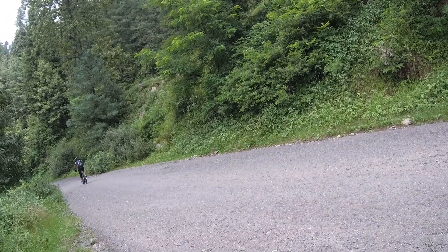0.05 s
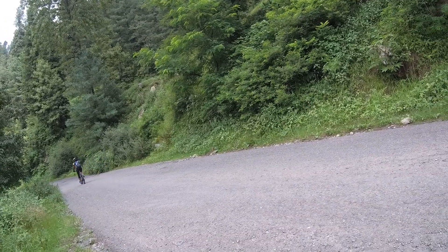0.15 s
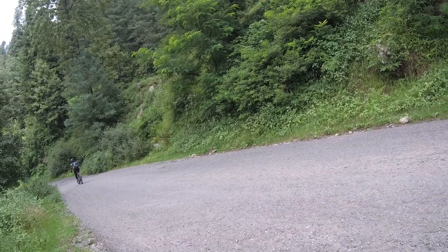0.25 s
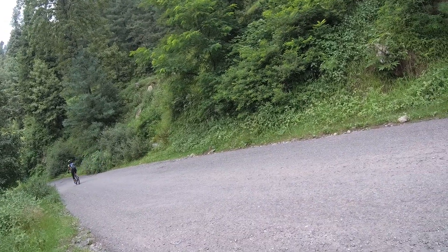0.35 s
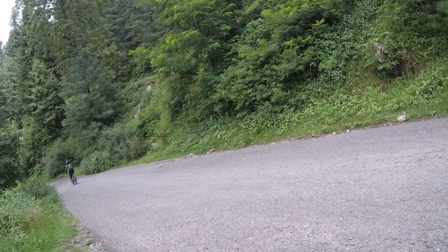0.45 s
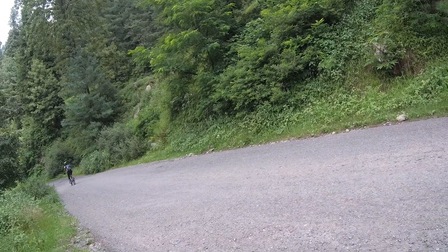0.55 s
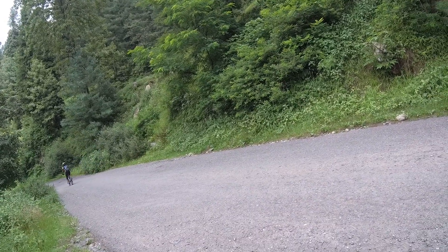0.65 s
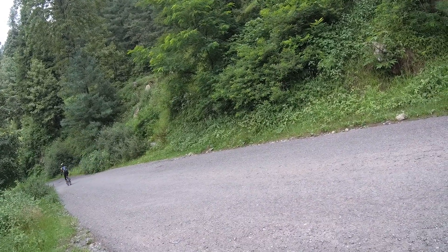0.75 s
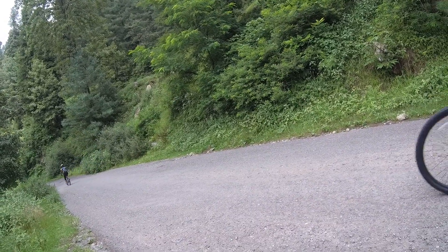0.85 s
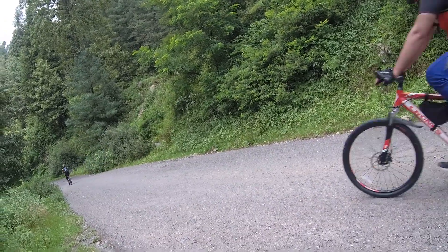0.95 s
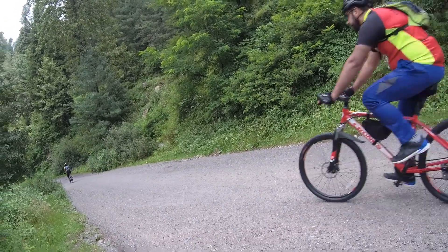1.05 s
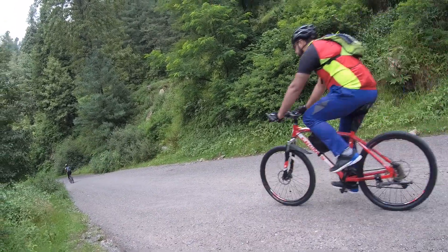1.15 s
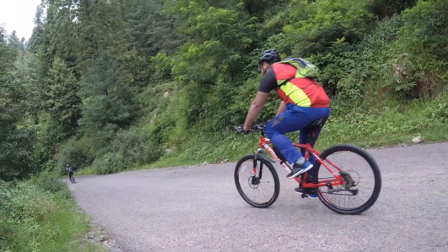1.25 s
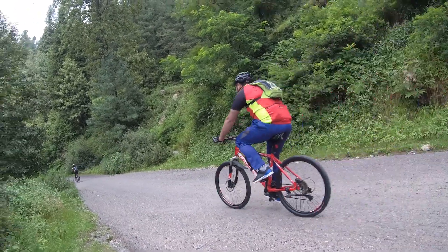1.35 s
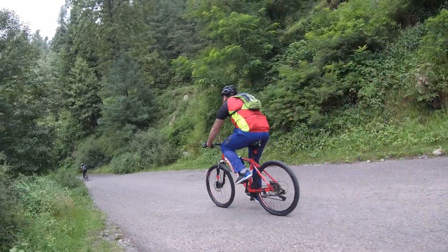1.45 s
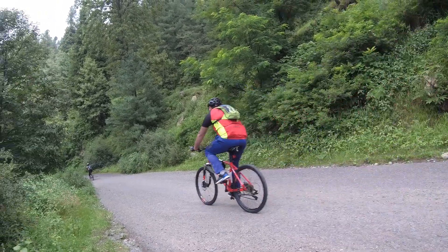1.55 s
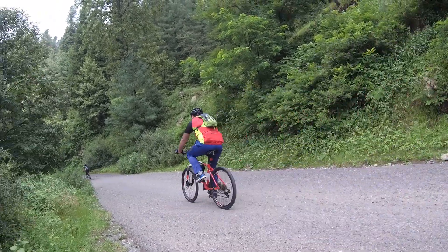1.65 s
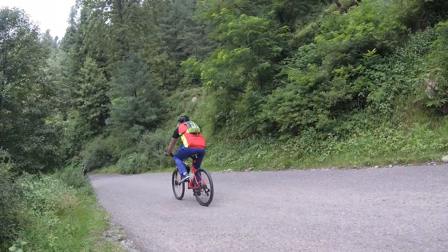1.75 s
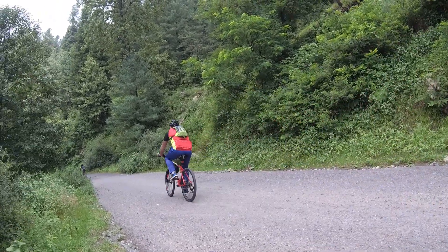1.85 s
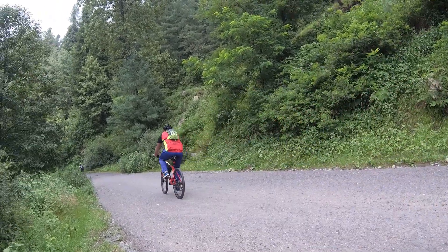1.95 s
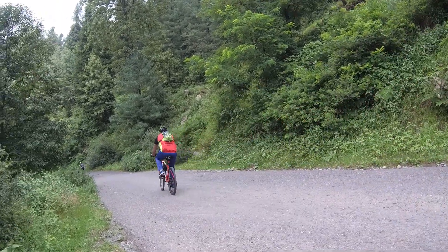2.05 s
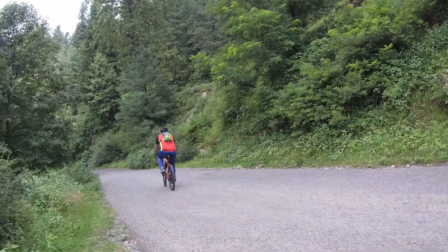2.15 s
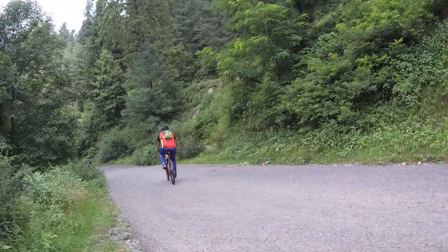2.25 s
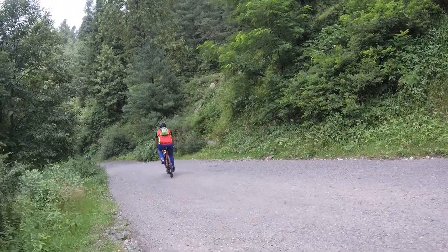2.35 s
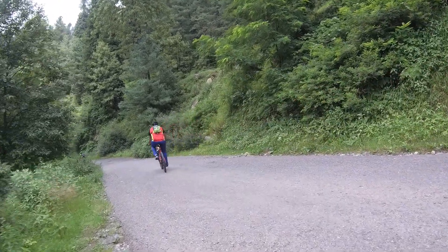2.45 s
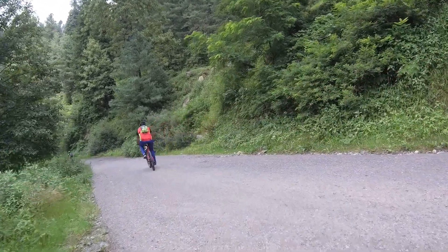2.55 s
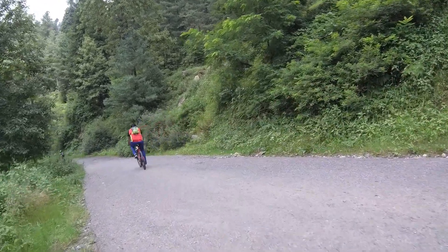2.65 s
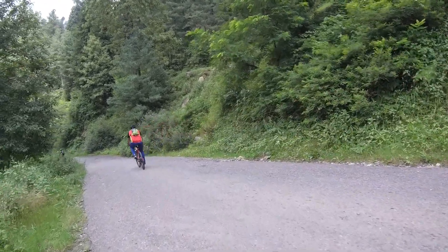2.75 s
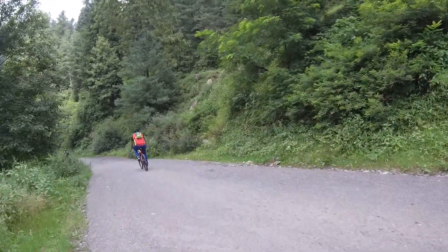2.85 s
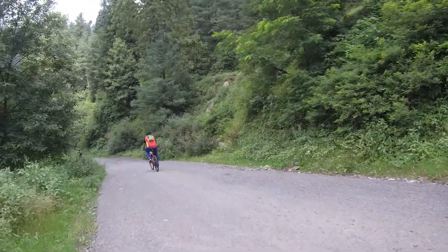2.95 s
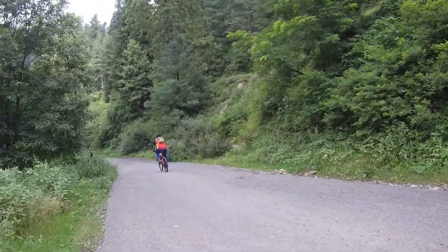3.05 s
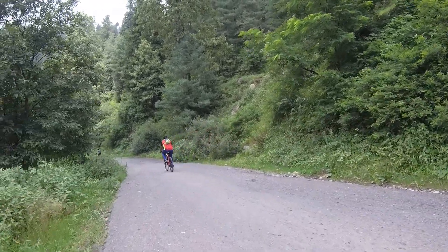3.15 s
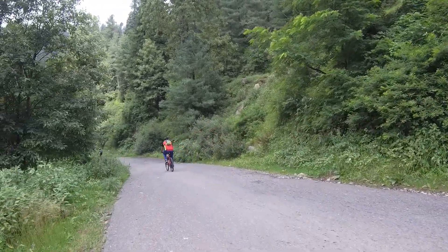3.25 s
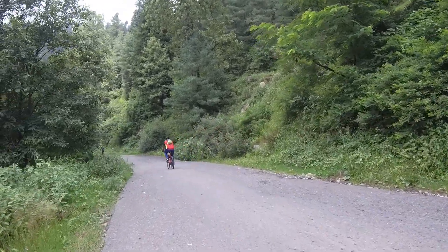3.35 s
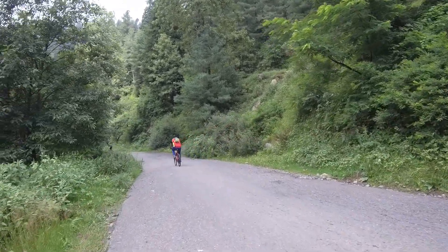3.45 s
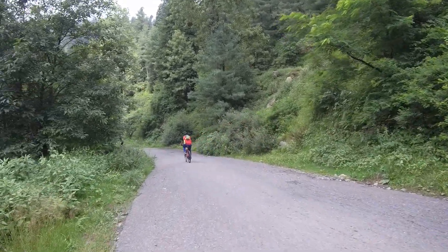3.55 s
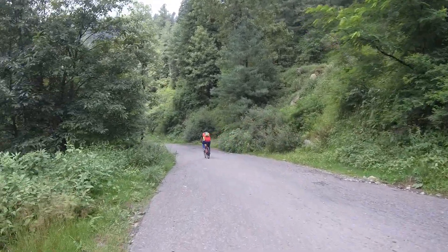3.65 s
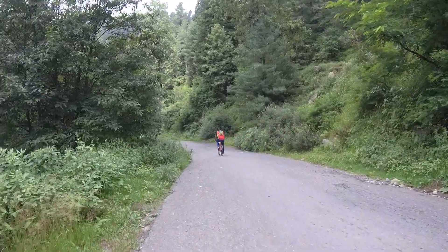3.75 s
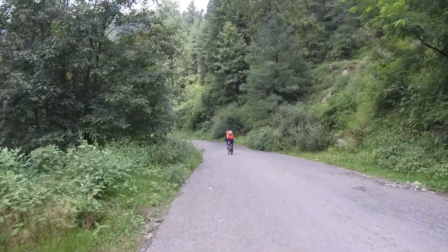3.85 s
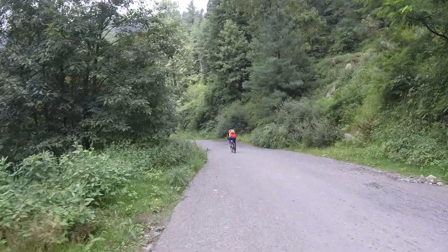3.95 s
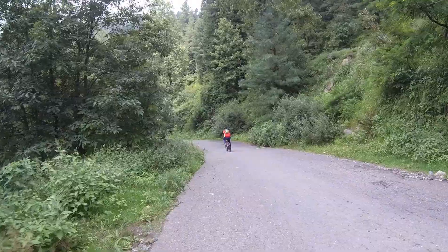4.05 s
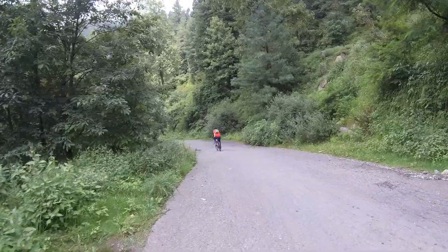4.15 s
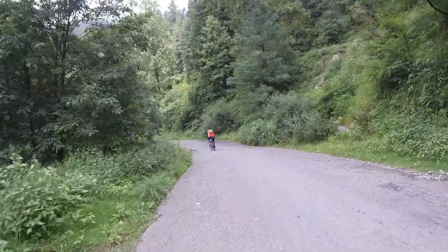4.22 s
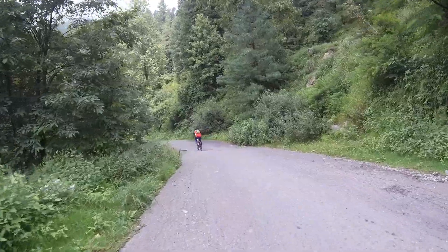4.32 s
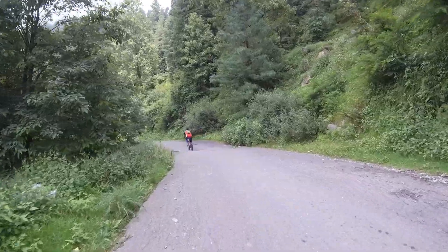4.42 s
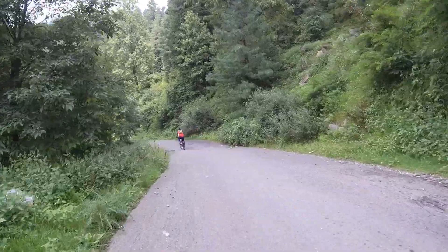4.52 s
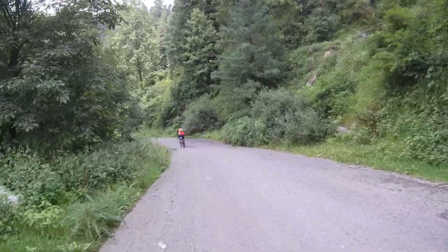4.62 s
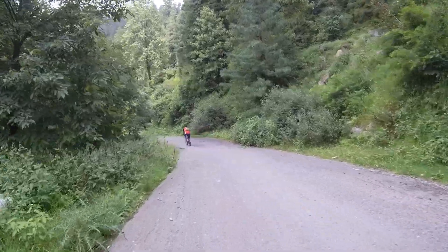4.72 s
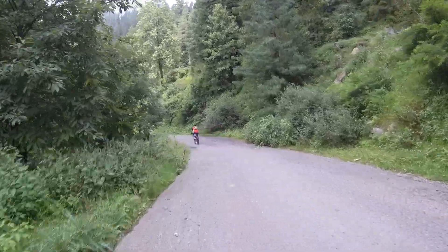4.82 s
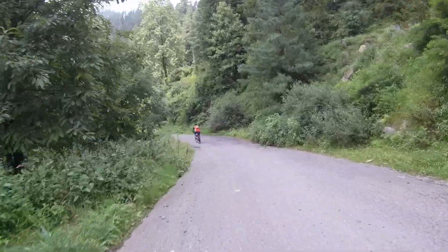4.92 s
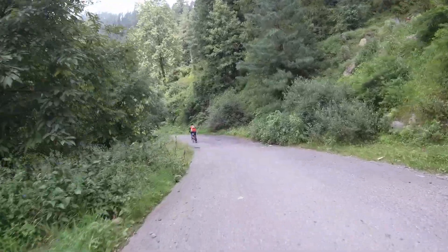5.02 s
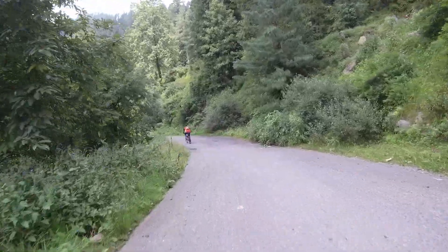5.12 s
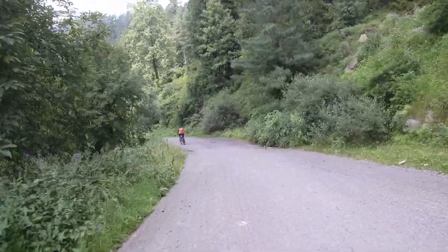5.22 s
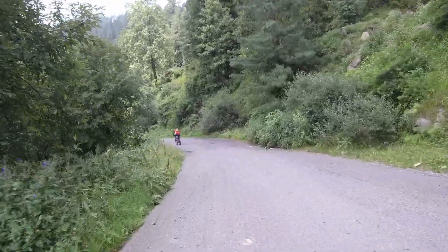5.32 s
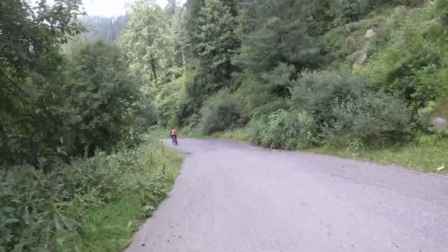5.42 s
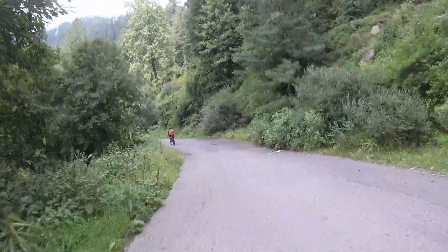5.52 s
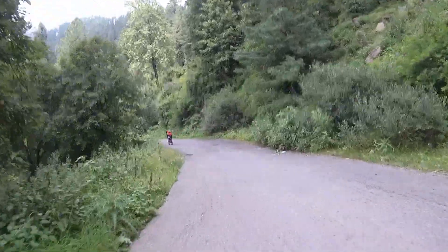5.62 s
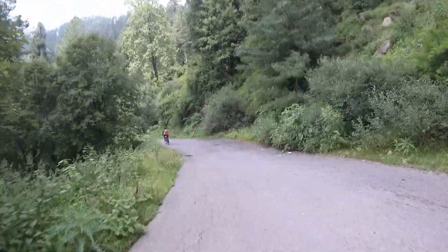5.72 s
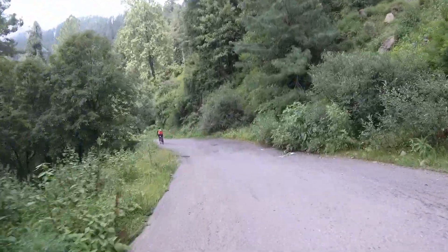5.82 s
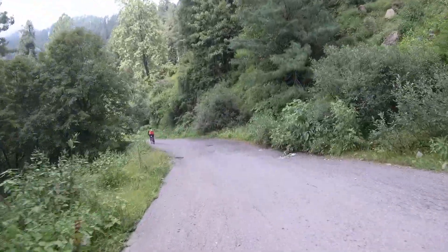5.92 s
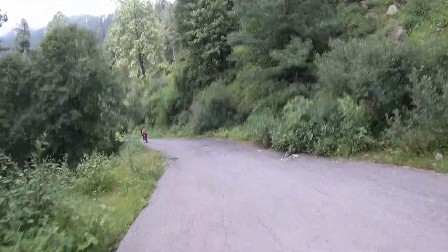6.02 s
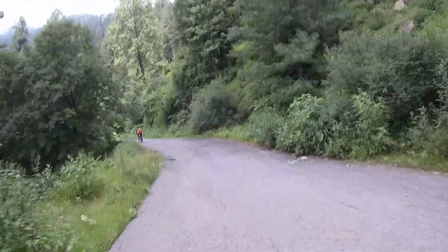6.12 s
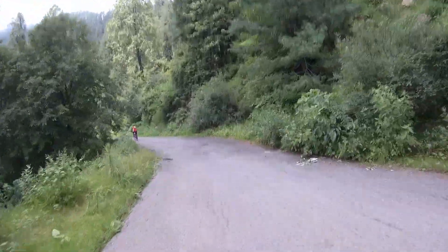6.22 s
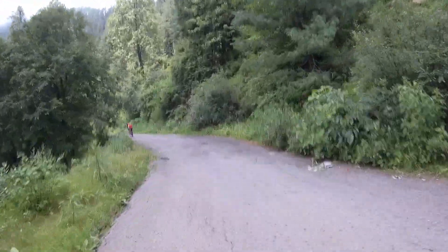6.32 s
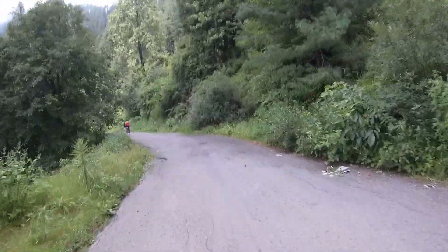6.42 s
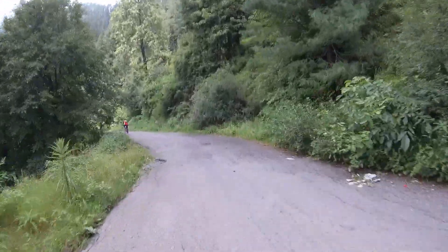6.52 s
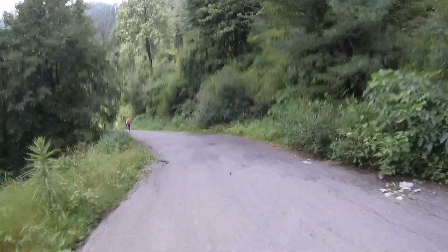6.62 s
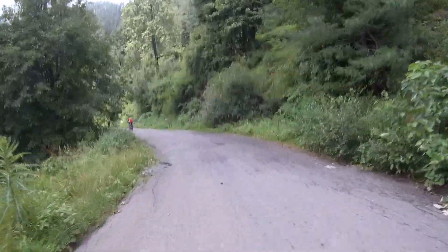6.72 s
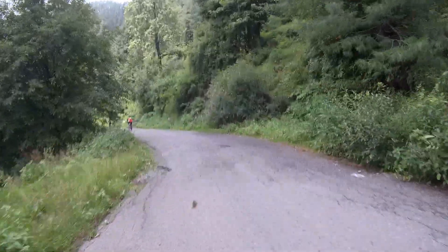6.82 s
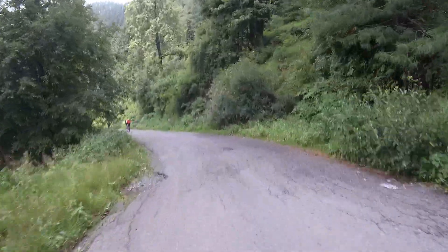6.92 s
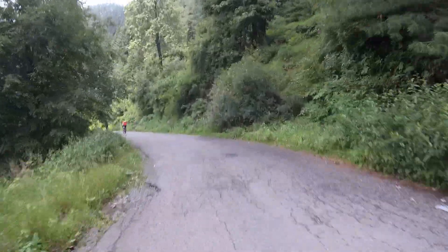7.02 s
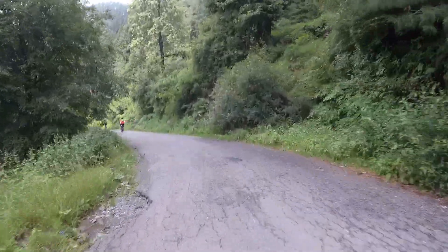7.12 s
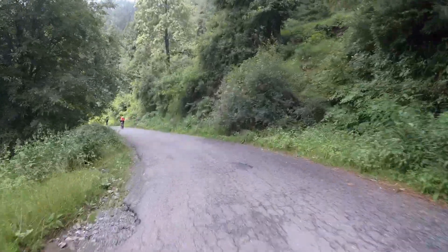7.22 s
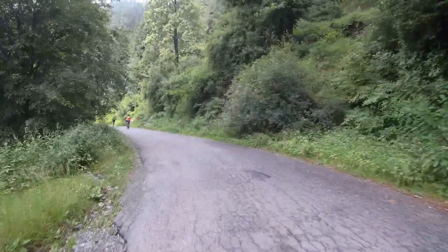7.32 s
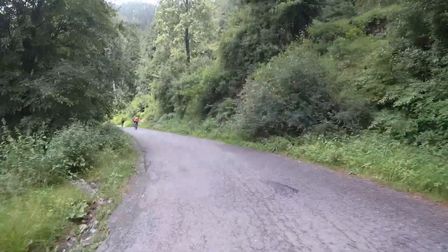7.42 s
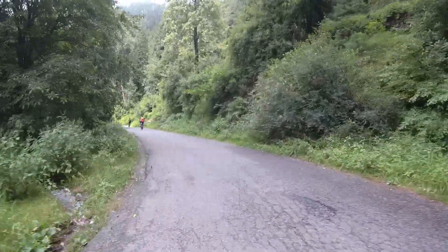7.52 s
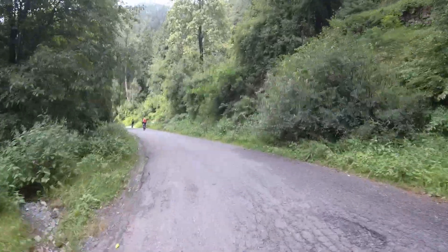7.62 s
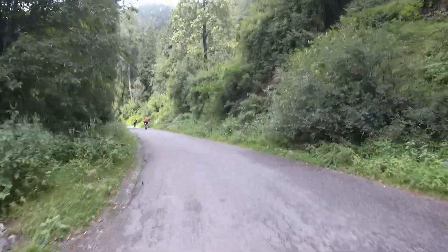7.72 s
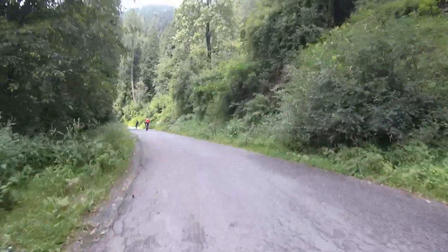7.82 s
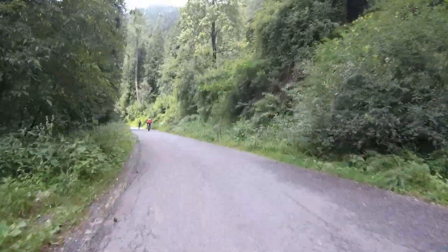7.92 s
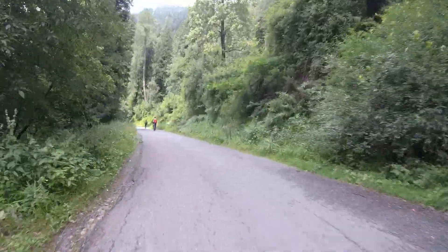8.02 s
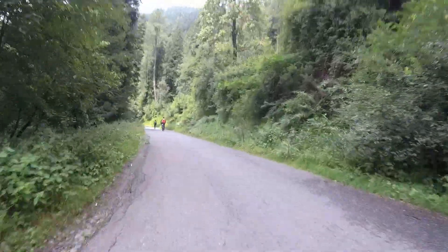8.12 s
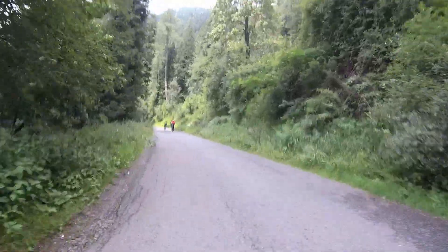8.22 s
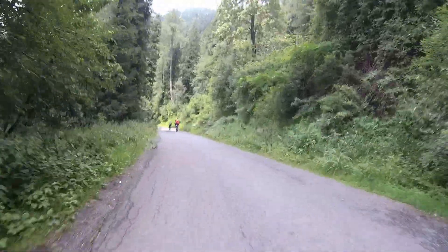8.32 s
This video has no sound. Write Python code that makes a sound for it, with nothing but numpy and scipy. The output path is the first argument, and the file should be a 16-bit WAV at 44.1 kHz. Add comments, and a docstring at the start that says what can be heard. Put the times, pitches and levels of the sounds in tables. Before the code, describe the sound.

Light freewheel clicks and a gear clack give way to a growing, buzzing rattle and wind as a bicycle gathers speed.

```python
"""Rough asphalt shakes a bicycle and its camera mount ever harder as it gathers speed on a forest road.
At the start the freewheel clicks, the bike knocks under the rider, two faint chirps fall in pitch, a
hand slides on the grip and another bicycle whirrs past. The chain clacks into gear and jingles, grit
pops under the tyres and wind rises over a thin hiss. At speed, hard bumps overload the microphone
with a gritty rasp that pulses with the mount's hum."""
import sys
import numpy as np
from scipy import signal
from scipy.fft import rfft, irfft, next_fast_len
from scipy.io import wavfile
from scipy.ndimage import uniform_filter1d

SR = 44100
rng = np.random.default_rng(int(sys.argv[2]) if len(sys.argv) > 2 else 0)


def waveform_to_disk(signal):
    """Save audio, clipped to [-1, 1], as 16-bit WAV at the path in sys.argv[1]."""
    frames = np.transpose(np.atleast_2d(signal))
    scaled = np.clip(frames, -1, 1) * 32767
    samples = np.round(scaled).astype(np.int16)
    wavfile.write(sys.argv[1], SR, samples)


N = 369116

T = np.arange(N) / SR

# Resonances: f/Hz, width/Hz, level/dB
MOUNT_MODES = [(189.3, 39, -19.5), (231.4, 23, -6.5), (268, 13, -9), (316.1, 22, 0), (355.5, 76, -13),
               (442.8, 31, -12), (500, 36, -20.5), (566.4, 24, -21), (616, 9.3, -39.5)]  # hum of the camera mount
FRAME_MODES = [(75.7, 19, -3), (91, 15, -0.5), (102, 15, -17), (131, 13, -8), (172, 50, -8.5)]  # rumble of the frame on its tyres
CASE_MODES = [(800, 140, -1), (1001, 67, 6), (1180, 88, 3.5), (1303, 100, 6.5), (1830, 80, 0),
              (2026, 120, -4), (2220, 87, -10)]  # buzz of the camera case
SMALL_PART_MODES = [(3120, 180, -3), (4150, 740, 0), (5770, 510, -5), (7800, 460, -2), (10250, 470, -13)]  # tick of its small hard parts
RASP_MODES = [(744, 230, 4), (940, 480, 6), (1290, 200, -5), (1930, 150, -8.5), (2670, 440, -13.5),
              (3320, 550, -19.5), (4500, 310, -20)]  # colour of the overload rasp
BOUNCE_MODES = [(85, 5.3, 0.5), (132, 44, -13), (166, 23, -9.5)]  # thud of the bike on its tyres after a blow
LINK_HIGH_MODES = [(7800, 600, 0)]  # top sparkle of the chain
# Clink of the chain links: ratio to the main ring, width/Hz, level/dB
LINK_MODES = [(0.633, 220.3, -2), (.79, 200, 0.5), (1, 280, 14), (1.09, 160, 3.5), (1.36, 413, -14.5)]
# Metallic ring of the drivetrain: f/Hz, level/dB, t60/s
DRIVETRAIN_MODES = [(333, -16, 0.67), (425, 2.5, 0.041), (448, -28, 0.52), (565, -23, 0.61),
                    (598, -10.5, 0.12), (640, -28, 1), (704, -27.5, 0.46), (760, -22.5, 0.44),
                    (836, -29, 0.62), (1004, 3, 0.064), (977, -24.5, 0.4), (1099, 5, 0.043),
                    (1383, 4.5, 0.018), (1400, -13, 0.085), (1670, -1, 0.035), (1992, 8, 0.027),
                    (2050, -22, 0.15), (2226, -21, 0.16)]

# Level rides: t/s, level/dB
SHAKE_RIDE = [(0, -76), (.65, -79), (.93, -50), (1.2, -58), (1.65, -58.5), (1.88, -49.5), (2.12, -59),
              (2.36, -45), (2.58, -33), (3.2, -37.5), (3.5, -35.5), (4.05, -30), (4.3, -26), (5.2, -21),
              (6.1, -17), (7.2, -13), (8.37, -11.5)]  # road shake: standing, creeping, rolling off, ever faster
RUMBLE_RIDE = [(0, -72), (.7, -78), (1.0, -52), (1.4, -88), (1.9, -60.5), (2.2, -66), (2.65, -39.5),
               (3.1, -46.5), (3.55, -42), (4.1, -39.5), (4.5, -41), (6.45, -26.5), (7.2, -30.5),
               (8.37, -28)]  # frame rumble, swelling on uneven road
GRIT_RIDE = [(2.45, -56.5), (2.8, -47), (3.08, -44.5), (3.35, -57), (3.85, -52), (4.6, -60.5), (8.37, -50)]  # grit, crunchiest under slow, loaded tyres
WIND_RIDE = [(0, -83), (2, -72), (3, -51.5), (3.6, -55), (4.5, -60.5), (5.5, -54.5), (7, -44.5),
             (8.37, -35.5)]  # wind past the microphone
HISS_RIDE = [(0, -73), (2.4, -75), (2.6, -74), (3.0, -86), (8.37, -91.5)]  # background hiss

# Noise colours: f/Hz, level/dB
TYRE_EQ = [(100, -9), (400, -2), (700, 4.5), (1250, -0.5), (1600, -14), (1900, 3), (2300, -6.5),
           (3000, -29), (16000, -46)]  # the other bicycle's tyres
WIND_EQ = [(20, -9.5), (50, 13.5), (120, -4), (300, 0.5), (600, 7), (1200, -2), (2100, -8), (2700, -71),
           (6000, -78.5), (16000, -79.5)]  # dark rush of wind
HISS_EQ = [(100, 6), (500, 12), (750, 9), (1150, 3.5), (1550, -2), (1900, 7), (2400, 2), (5000, -1.5),
           (8000, -5), (11000, -11.5), (15000, -11.5)]  # thin hiss

# Larger bumps in the road: t/s, length/s, mount swing/dB, rasp/dB
BUMP_CUES = [(2.074, 0.055, -48, -92), (3.259, 0.049, -25, -69), (4.117, 0.017, -21, -71),
             (4.167, .01, -19, -70), (4.245, 0.042, -18, -69), (4.517, 0.013, -17, -67.5),
             (4.966, 0.035, -15.5, -70), (5.089, 0.02, -12.5, -62.5), (5.206, 0.016, -13, -58),
             (5.308, 0.015, -11.5, -47), (5.35, 0.019, -13.5, -63), (5.447, 0.011, -15, -55),
             (5.52, 0.013, -7.5, -23), (5.675, 0.0089, -10.5, -62), (5.702, 0.027, -10.5, -40),
             (5.925, 0.026, -11, -68.5), (6.023, 0.043, -11.5, -68), (6.073, 0.0034, -5.5, -37.5),
             (6.099, 0.013, -12.5, -33), (6.126, 0.003, -4.5, -41.5), (6.208, 0.02, -10, -66),
             (6.332, 0.0035, -6, -51), (6.344, 0.0095, -8, -57), (6.414, 0.0097, -9, -38),
             (6.426, .005, -8, -29.5), (6.475, 0.0065, -5.5, -28.5), (6.706, 0.015, -7.5, -28),
             (6.719, .006, -5, -31), (6.726, 0.0097, -8, -27), (6.751, 0.021, -7, -50),
             (6.803, 0.0068, -1.5, -35), (6.818, 0.037, -7, -50), (6.889, 0.0039, -4.5, -45),
             (6.915, 0.0033, -5.5, -37), (6.924, .014, -11, -36), (7.007, 0.0059, -4.5, -32.5),
             (7.059, 0.0097, -3.5, -30), (7.236, .007, -6, -52), (7.293, 0.0065, -3, -31.5),
             (7.307, .016, -5, -39), (7.551, 0.0049, -2.5, -40), (7.616, 0.0099, -3.5, -27),
             (7.631, 0.0039, -5, -29), (7.638, 0.027, 0.5, -19), (7.682, 0.0039, -1, -29.5),
             (7.721, 0.0065, -4.5, -44), (7.734, .007, -1.5, -29.5), (7.753, 0.0079, -4, -29),
             (7.848, 0.0067, -3.5, -26), (7.911, 0.0055, -4.5, -30), (7.919, 0.0065, 0, -23.5),
             (7.932, 0.0065, 0.5, -21), (7.948, .015, 1.5, -14.5), (7.982, 0.0064, -7, -26.5),
             (7.994, 0.0084, 1, -20.5), (8.01, 0.013, -5.5, -26), (8.047, 0.0056, -6, -27),
             (8.058, 0.0049, -3.5, -29), (8.079, 0.0052, -3.5, -41.5), (8.129, .005, -6.5, -27),
             (8.138, 0.008, -1.5, -26), (8.158, 0.0071, 0, -24.5), (8.175, 0.027, -6.5, -30.5),
             (8.226, 0.0074, -1.5, -28.5), (8.305, 0.0053, -3, -36), (8.32, 0.0065, -4, -26.5),
             (8.329, 0.0083, -.5, -25), (8.34, 0.0035, -2.5, -23), (8.351, 0.0044, -1, -25.5)]
# Knocks of the bike: t/s, level/dB, weight (frame send)/dB, hardness (case send)/dB, struck part f/Hz
KNOCK_CUES = [(1.513, -20.5, -27, -15.5, 276), (1.694, -16.5, -8, -31, 276), (1.725, -12.5, -3, -31, 309),
              (1.734, -25.5, -7.5, -16, 250), (1.755, -24, -6, -30, 310), (1.794, -40, 6, -4, 460),
              (1.873, -40, -12, -10, 326), (1.894, -31, -8, -21, 296), (2.216, -35, -14, -9, 323),
              (2.349, -29.5, -3.5, -10, 325), (2.459, -34.5, -2, 2.5, 522), (2.498, -26, -3.5, -33, 312),
              (2.536, -26, -29.5, -30, 323), (2.726, -9.5, -7, -14, 272), (2.778, -27, -25, -1, 232),
              (2.869, -16.5, -5.5, -29, 280), (2.912, -16.5, -1, -23, 326), (2.938, -17, -15, -19, 323),
              (2.948, -9, -33, -21.5, 222), (2.965, -15.5, -3, -6, 274), (3.026, -22.5, -13, -11, 242),
              (3.08, -25.5, -13, -10, 356), (3.099, -36, -5, 8, 343), (3.134, -17.5, -1.5, -5, 370),
              (3.169, -18.5, -15, -18, 457), (3.263, -25, -27, -7, 374), (3.412, -22.5, -13, -17, 286),
              (3.416, -30.5, -30, -20, 640), (3.45, -28, 1.5, -5.5, 330), (3.645, -42, -24, 8.5, 237),
              (3.67, -36, -16.5, -6, 335), (3.72, -27.5, -17, -11, 327), (3.81, -24.5, -16, -12, 442),
              (3.827, -36, -17, -3.5, 330), (3.865, -22, -20, -13, 280), (3.885, -38, -21, -2.5, 297),
              (3.904, -20, -27, -9, 331), (3.965, -31, -5.5, -2, 313), (4.041, -28.5, -20.5, 1, 247),
              (4.43, -30.5, -32.5, 1.5, 316), (5.523, -13, 2, -8, 325)]
# Gear clacks: t/s, level/dB, chatter/dB, shudder/dB, crack/dB (these three relative to the level),
# chatter tilt/(dB per octave), chatter decay/s
GEAR_CUES = [(3.1197, -1, -26.5, -26, -21, -9, 0.0056), (5.725, -14.5, -7.5, -35, -41.5, 11.5, 0.0058)]
# Clicks of pawls and levers: t/s, level/dB, hardness (case send)/dB, struck part f/Hz
PAWL_CUES = [(0.139, -41.5, -14, 346), (0.26, -39, -1.5, 333), (0.291, -43.5, -8, 347),
             (0.615, -38.5, -5.5, 334), (.658, -41.5, -10, 456), (0.694, -41, -8, 333),
             (0.727, -44.5, -13, 446), (0.772, -40, -17, 343), (0.805, -41.5, -8, 460),
             (0.839, -42.5, -9, 500), (0.877, -51, 0, 478), (0.914, -33, -23, 231),
             (0.924, -29.5, -13.5, 292), (.962, -41, -5, 300), (1.012, -29.5, -3, 386),
             (1.093, -30, -24, 321), (1.118, -40, -29, 334), (1.318, -48.5, -16, 340),
             (1.355, -43, -13, 470), (1.525, -23.5, -26, 465), (2.727, -15.5, -26.5, 343)]
# Jingles of the slack chain: t/s, level/dB, main ring f/Hz, relative level of the high ring/dB
JINGLE_CUES = [(2.575, -63, 4200, -30), (2.635, -61, 3900, -30), (2.69, -61, 4400, -30),
               (2.819, -62.5, 4250, -30), (3.02, -62, 4170, -40), (3.328, -63.5, 4250, -30),
               (3.644, -59, 4120, -32), (3.882, -55.5, 3770, -37), (4.435, -54, 4000, 3),
               (5.144, -60, 4000, -29), (5.314, -60.5, 4200, -26.5), (6.103, -49.5, 3750, -18.5),
               (6.425, -50, 4450, -39.5), (6.635, -47.5, 4150, -42), (6.729, -56, 4050, -36),
               (7.064, -44.5, 4400, -38.5), (7.414, -47.5, 4210, -33), (7.594, -50, 4500, -35),
               (7.76, -48.5, 4500, -34), (7.855, -38, 4240, -37), (7.876, -41, 4400, -42),
               (8.231, -51, 4500, -36), (8.346, -40.5, 4310, -35.5)]
# Faint falling chirps: t/s, length/s, level/dB, starting f/Hz
CHIRP_CUES = [(1.706, 0.046, -50.5, 2070), (2.938, 0.042, -55.5, 2720)]


def road():
    """Road texture hums in the mount, rumbles in the frame and buzzes in the case; bumps kick harder."""
    shake_db, kicks = curve(SHAKE_RIDE), bump_kicks()
    hum, swing = mount(shake_db, kicks)
    rumble = amp(curve(RUMBLE_RIDE)) * shaken(FRAME_MODES, 220, spread_db=2.2, roughness=0.11)
    buzz_level = amp(-28.5 + 0.96 * shake_db) + amp(-44.5) * kicks
    buzz = buzz_level * shaken(CASE_MODES, 280, spread_db=2.1, roughness=0.9)
    return lowpass(hum + rumble, 1100) + lowpass(buzz, 2400, order=8) + overload_rasp(swing)


def bump_kicks():
    """Envelope of the swing from the larger bumps; where they overlap, the strongest wins."""
    kicks = np.zeros(N)
    for s, length, db, _ in BUMP_CUES:
        kick = amp(db) * surge(length)
        under_way = kicks[round(s * SR):][:len(kick)]
        add(kicks, s, np.maximum(kick[:len(under_way)] - under_way, 0))
    return kicks


def mount(shake_db, kicks):
    """The mount sways on the road. Returns its sound and its main swing, levelled to about 1."""
    main_hz, main_width_hz, limit_db = 318.3, 90, -5.5
    small_bumps_per_s, small_bump_db = 12, -8
    modes = shaken(MOUNT_MODES, 400, spread_db=2.5, roughness=0.92, window=3000)
    hz = np.fft.fftfreq(next_fast_len(N), 1 / SR)
    main_band = 2 * np.exp(-((hz - main_hz) / main_width_hz) ** 2)
    hum = np.fft.ifft(np.fft.fft(modes, len(hz)) * main_band)[:N]  # analytic: abs() is its envelope
    swing = hum.real / np.sqrt(abs(hum) ** 2 + 0.0089)
    small_bumps = triggers(small_bumps_per_s) * rng.random(N) * amp(small_bump_db)
    small_bumps = excite(small_bumps, surge(0.0044))
    other_modes = amp(2.5 + 0.092 * shake_db) * (modes - hum.real)  # these open up with speed
    sway = amp(shake_db - 2) * (hum.real + other_modes + small_bumps * swing)
    reach = abs(signal.hilbert(sway, len(hz))[:N])
    # a soft limit holds the steady hum back from overload; the larger bumps bypass it
    gain = soft_limit_gain(reach, amp(limit_db), knee=8)
    top_up = np.maximum(kicks - uniform_filter1d(gain * reach, size=130), 0)
    return gain * sway + top_up * swing, swing


def overload_rasp(swing):
    """A gritty overload rasp on hard bumps, pulsing with each half swing of the hum."""
    attack_s, fuzz_s, uneven_db, bright_db = 0.002, 0.0007, 3, -20
    drive, onsets = np.zeros(N), np.zeros(N)
    for s, length, _, db in BUMP_CUES:
        add(drive, s, amp(db) * surge(length, attack_s, release_s=0.0026))
        add(onsets, s + attack_s, amp([db]))
    crossings = np.diff(np.sign(swing), prepend=0) / 2
    pulses = crossings * amp(uneven_db * np.clip(rng.standard_normal(N), -2, 2) - 4)
    fuzz = amp(-16) * rng.standard_normal(N) * excite(abs(pulses), np.exp(-T[:SR // 200] / fuzz_s))
    rasp = excite(onsets + drive * (pulses + fuzz), ring(RASP_MODES))
    dull = signal.oaconvolve(rasp, signal.firwin(101, 4100, fs=SR), "same")
    brightness = np.minimum(drive / amp(bright_db), 1)  # only the hardest bumps keep their edge
    return lowpass(dull + brightness * (rasp - dull), 5500, order=8)


def knocks():
    """The bike knocks as it takes the rider's weight and starts to roll."""
    out = np.zeros(N)
    for s, db, weight, hardness, hz in KNOCK_CUES:
        knock = blow(hz, tilt_db=11.5, mount_db=-2.5, part_db=-4.5, overtone_db=-18.5,
                     frame_db=weight, case_db=hardness, scrape_db=2)
        add(out, s, amp(db) * knock)
    return out


def gears():
    """The chain drops onto a sprocket: a crack, a chatter of contacts, ringing metal and a shudder."""
    out, t = np.zeros(N), np.arange(SR * 3 // 4) / SR
    attack_s, crack_s, shudder_t60 = 0.00081, 0.0034, 0.52
    shudder = noise([(100, -24), (330, 0), (470, 0.5), (780, -4.5), (950, -20), (1400, -17.5),
                     (2200, -26), (2800, -56.5), (16000, -104)])[:len(t)]
    crack = noise([(100, 0), (2500, 5), (5000, -9), (16000, -28)])[:len(t)] * np.exp(-t / crack_s)
    for s, db, chatter_db, shudder_db, crack_db, tilt_db, decay_s in GEAR_CUES:
        metal = sum(amp(mode_db - 60 * t / t60) * np.sin(2 * np.pi * (hz * t + rng.random()))
                    for hz, mode_db, t60 in DRIVETRAIN_MODES)
        metal *= 1 - np.exp(-t / attack_s)
        clack = metal / abs(metal).max()
        add(clack, 0, amp(chatter_db) * chatter(SMALL_PART_MODES, decay_s, tilt_db))
        clack += amp(crack_db) * crack + amp(shudder_db - 60 * t / shudder_t60) * shudder
        add(out, s, amp(db) * clack)
    return out


def freewheel():
    """Pawls and levers click: a light blow with a dry snap and a tick of the small parts."""
    out = np.zeros(N)
    snap_hz, snap_width_hz = 6000, 5200
    for s, db, hardness, hz in PAWL_CUES:
        click = blow(hz, tilt_db=12.5, mount_db=-4.5, part_db=-8.5, overtone_db=-32,
                     frame_db=-15.5, case_db=hardness, scrape_db=-3)
        add(out, s, amp(db) * click)
        tick = scraped(ring(SMALL_PART_MODES, scatter_db=2.2), scrape_db=-3)
        tick += amp(-1) * ring([(snap_hz, snap_width_hz, 0)])
        add(out, s, amp(4 + 1.53 * db + 0.52 * hardness) * tick)  # strong, hard clicks tick more
    return out


def blow(hz, tilt_db, mount_db, part_db, overtone_db, frame_db, case_db, scrape_db):
    """One hit rings the struck part, mount, frame and case; tilt_db favours the mount's upper modes."""
    part = [(hz, 24, 0), (hz * 2.253, 40, overtone_db)]
    body = amp(mount_db) * ring(MOUNT_MODES, tilt_db, scatter_db=2.2) + amp(part_db) * ring(part)
    thud = amp(frame_db - 4) * lowpass(ring(BOUNCE_MODES, size=32768), 400, order=2)
    case = scraped(ring(CASE_MODES, tilt_db=6.5, scatter_db=2.2), scrape_db)
    add(thud, 0, lowpass(body, 810) + amp(case_db) * lowpass(case, 2200, order=6))
    return thud


def scraped(sound, scrape_db, slips_per_s=900, decay_s=0.0064):
    """Parts scrape as they meet: a first contact with a short, rough tail."""
    t = np.arange(SR // 16) / SR
    slips = triggers(slips_per_s, len(t)) * rng.standard_normal(len(t)) * np.exp(-t / decay_s)
    force = amp(scrape_db) * slips / (np.linalg.norm(slips) + 1e-9) + (t == 0)
    return excite(sound, force / np.linalg.norm(force))


def chain():
    """Slack links clink against each other on rough ground and at each hard knock."""
    clinks, sparkle = np.zeros(N), np.zeros(N)
    for s, db, hz, high_db in JINGLE_CUES:
        add(clinks, s, amp(db) * chatter(links(hz), decay_s=0.01, swell_s=0.0017, contacts_per_s=6400))
        add(sparkle, s, amp(db + high_db) * chatter(LINK_HIGH_MODES, decay_s=0.006))
    for s, db, _, hardness, _ in KNOCK_CUES:
        jingle = chatter(links(4000 * rng.uniform(1.0, 1.1)), decay_s=0.005, contacts_per_s=2200)
        add(clinks, s, amp(db + hardness - 43) * jingle)
    return lowpass(clinks, 5400, order=8) + lowpass(sparkle, 8600, order=8)


def links(hz):
    """The modes of chain links whose main ring is at hz."""
    return [(ratio * hz, width, db) for ratio, width, db in LINK_MODES]


def grit():
    """Once the tyres roll, grains of grit pop under them in clumps and tick through the case."""
    start_s, pops_per_s, clump_db, spread_db = 2.45, 180, 8.5, 2.5
    clumps = noise([(1, 0), (15, 0), (40, -20), (150, -90)])
    rate = pops_per_s * amp(clump_db * np.clip(clumps, -2, 1.5)) * (T > start_s)
    pops = triggers(rate) * amp(curve(GRIT_RIDE) + spread_db * np.minimum(rng.exponential(1, N), 3))
    return lowpass(excite(pops, ring(CASE_MODES, tilt_db=5)), 1900, order=8)


def chirps():
    """Two faint, short, rough chirps that sag in pitch."""
    sag_hz_per_s, roughness_hz, attack_s = 8000, 150, 0.004
    out, t = np.zeros(N), np.arange(SR // 10) / SR
    for s, length, db, hz in CHIRP_CUES:
        cycles = np.cumsum(hz - sag_hz_per_s * t) / SR
        rough = lowpass(rng.standard_normal(len(t)), roughness_hz)
        envelope = np.minimum(t / attack_s, 1) * np.clip(1 - (t / length) ** 2, 0, 1)
        add(out, s, amp(db) * envelope * evened(rough * np.sin(2 * np.pi * cycles)))
    return out


def grip():
    """A hand slides on the grip, presses harder and lets go; its slips rustle in case and small parts."""
    start_s, peak_s, release_s = 2.19, 2.385, 0.023
    rustle = shaken(CASE_MODES, 440, spread_db=3.2, roughness=1, tilt_db=18)
    fizz = shaken(SMALL_PART_MODES, 340, spread_db=3.6, roughness=0.95, tilt_db=7)
    press = (T > start_s) * amp(np.interp(T, [start_s, peak_s], [-67, -52.5]))
    release = np.exp(-np.maximum(T - peak_s, 0) / release_s)
    return press * release * (rustle + amp(-11.5) * fizz)


def overtaker():
    """The tyres of another bicycle whirr softly as it passes and draws away."""
    nearest_s, nearest_m, faster_m_per_s, nearest_db = 1.8, 2.2, 3.4, -68
    distance = np.hypot(nearest_m, faster_m_per_s * (T - nearest_s))
    return amp(nearest_db) * (nearest_m / distance) ** 2 * noise(TYRE_EQ)


def air():
    """Wind builds with speed and buffets in lumps, over a thin bed of hiss."""
    gust_db = 5 * np.tanh(noise([(1, 0), (12, -3), (40, -25), (150, -90)]))
    wind = amp(curve(WIND_RIDE) + gust_db) * noise(WIND_EQ)
    return wind + amp(curve(HISS_RIDE)) * noise(HISS_EQ)


def shaken(modes, hits_per_s, spread_db, roughness, tilt_db=0, window=4000):
    """Resonances driven by a surface: separate hits of uneven size plus fine, steady roughness."""
    hits = triggers(hits_per_s) * amp(spread_db * np.minimum(rng.exponential(1, N), 4))
    force = evened(hits * rng.choice([-1, 1], N)) + roughness * rng.standard_normal(N)
    texture = excite(force, ring(modes, tilt_db))
    slow_power = uniform_filter1d(uniform_filter1d(texture ** 2, size=window), size=window // 4)
    return texture / np.sqrt(abs(slow_power) + 1e-12)  # level the swells, keep the flutter


def chatter(modes, decay_s, tilt_db=0, swell_s=0, contacts_per_s=8000):
    """A quick cluster of tiny contacts rings the modes and dies away; peak 1."""
    t = np.arange(SR // 10) / SR
    contacts = triggers(contacts_per_s, len(t)) * rng.standard_normal(len(t))
    attack = np.minimum((t + 1e-9) / (swell_s + 1e-9), 1)
    contacts *= attack * np.exp(-((t - swell_s) / decay_s) ** 2 / 2)
    burst = excite(contacts, ring(modes, tilt_db, size=2048))
    return burst / (abs(burst).max() + 1e-12)


def ring(modes, tilt_db=0, scatter_db=0, size=8192):
    """Impulse response of modes, peak 1, tilted by tilt_db per octave, with random level scatter."""
    hz, width, db = np.transpose(modes)[:, :, None]
    db = db + tilt_db * np.log2(hz / hz[0]) + scatter_db * rng.standard_normal(hz.shape)
    f = np.fft.rfftfreq(size, 1 / SR) + 1
    detune = (f ** 2 - hz ** 2) / (2 * f * width)
    power = ((amp(db) / (1 + detune ** 2)) ** 2).sum(0)
    # minimum phase puts the attack right at the front
    cepstrum = irfft(np.log(power / power.max() + 1e-10) / 2)
    cepstrum[1:size // 2] *= 2
    cepstrum[size // 2 + 1:] = 0
    response = irfft(np.exp(rfft(cepstrum)))[:size // 2]
    return response / abs(response).max()


def surge(length, attack_s=0.003, release_s=0.008):
    """Attack, hold and release of one bump."""
    t = np.arange(SR // 8) / SR
    return np.minimum(t / attack_s, 1) * np.exp(-np.maximum(t - length, 0) / release_s)


def noise(colour):
    """Steady noise of rms 1, coloured by rows of f/Hz, level/dB."""
    hz, db = np.transpose(colour)
    size = next_fast_len(N)
    gain = amp(np.interp(np.log(np.fft.rfftfreq(size, 1 / SR) + 1), np.log(hz), db))
    return evened(irfft(rfft(rng.standard_normal(size)) * gain, size)[:N])


def triggers(per_s, size=N):
    return rng.random(size) < per_s / SR


def excite(force, response):
    return signal.oaconvolve(force, response)[:len(force)]


def soft_limit_gain(x, ceiling, knee):
    return (1 + abs(x / ceiling) ** knee) ** (-1 / knee)


def lowpass(x, hz, order=4):
    return signal.sosfilt(signal.butter(order, min(hz, SR * .45), fs=SR, output="sos"), x)


def amp(db):
    return 10 ** (np.asarray(db) / 20)


def evened(x):
    return x / np.sqrt(np.mean(x ** 2) + 1e-20)


def curve(rows, column=1):
    """One column of a table, joined by straight lines in time."""
    rows = np.asarray(rows)
    return np.interp(T, rows[:, 0], rows[:, column])


def add(mix, s, sound):
    part = mix[max(round(s * SR), 0):][:len(sound)]
    part += sound[:len(part)]


def scene():
    """Everything reaches one microphone through the bike or the air."""
    bed = road() + grit() + air() + overtaker()
    return (bed + grip() + freewheel() + knocks() + chirps() + gears() + chain())[None]


def record(dry):
    """The microphone overloads with a dull rasp; its circuit turns the phase and trims bass and top."""
    rasp_hz, allpass_hz, low_cut_hz, high_cut_hz = 2600, 135, 44, 15500
    excess = dry - dry * soft_limit_gain(dry, ceiling=0.48, knee=9)
    driven = dry - signal.oaconvolve(excess, signal.firwin(81, rasp_hz, fs=SR)[None], "same")
    pole = np.exp(-2 * np.pi * allpass_hz / SR)
    turned = signal.lfilter([pole, -1], [1, -pole], driven)
    trimmed = signal.sosfilt(signal.butter(3, low_cut_hz, "high", fs=SR, output="sos"), turned)
    fade_out = np.minimum((N - np.arange(N)) / 200, 1)
    high_cut = signal.firwin(255, high_cut_hz, window=("kaiser", 9), fs=SR)
    return signal.oaconvolve(trimmed * fade_out, high_cut[None], "same")


dry = scene()
out = record(dry)
waveform_to_disk(out)
```